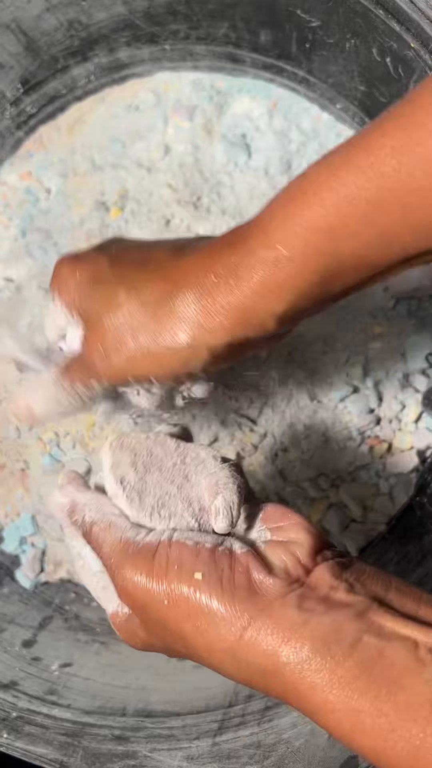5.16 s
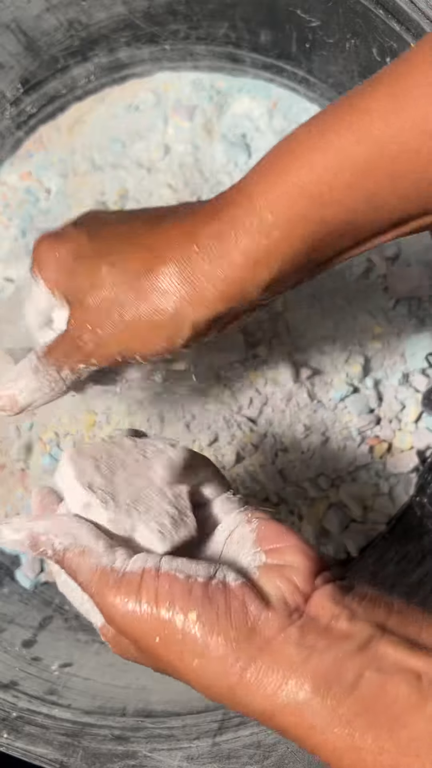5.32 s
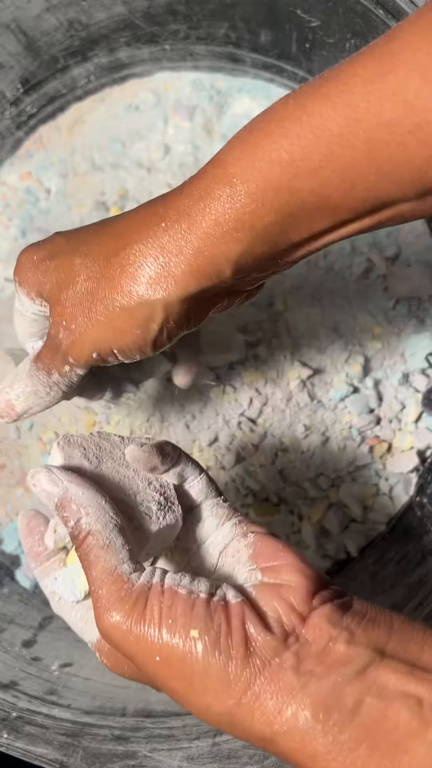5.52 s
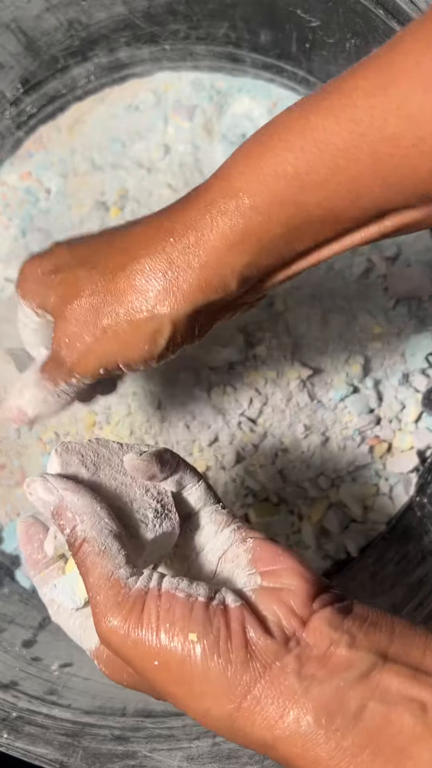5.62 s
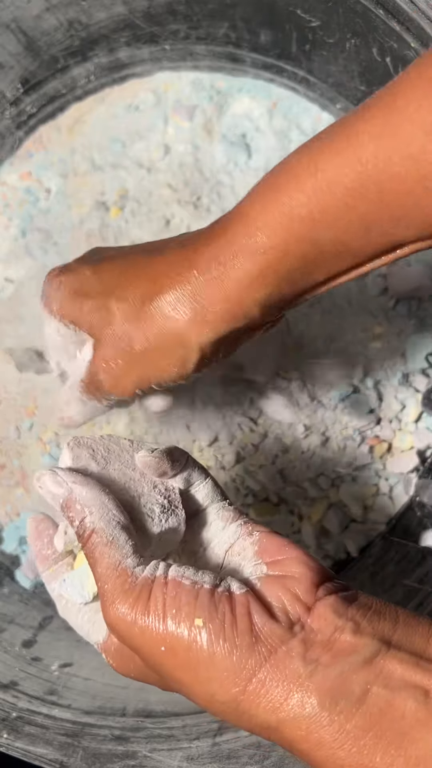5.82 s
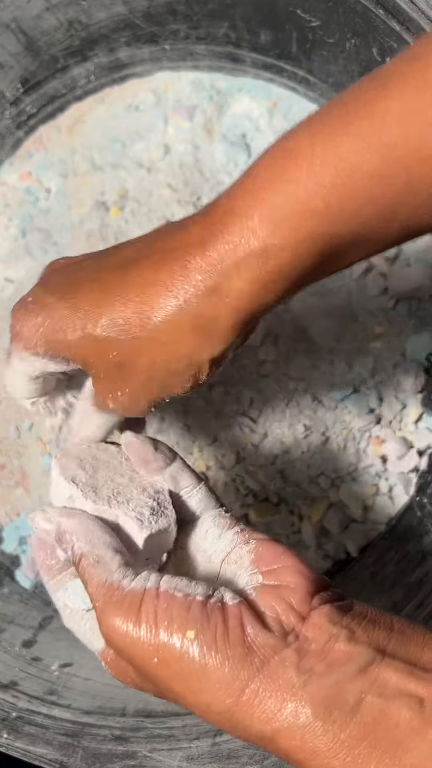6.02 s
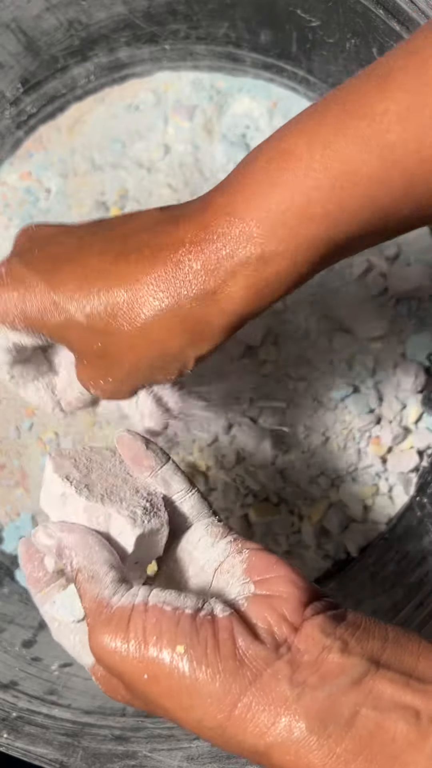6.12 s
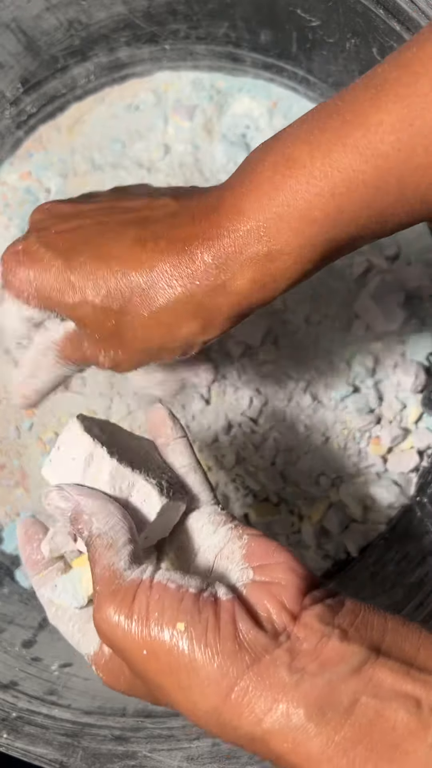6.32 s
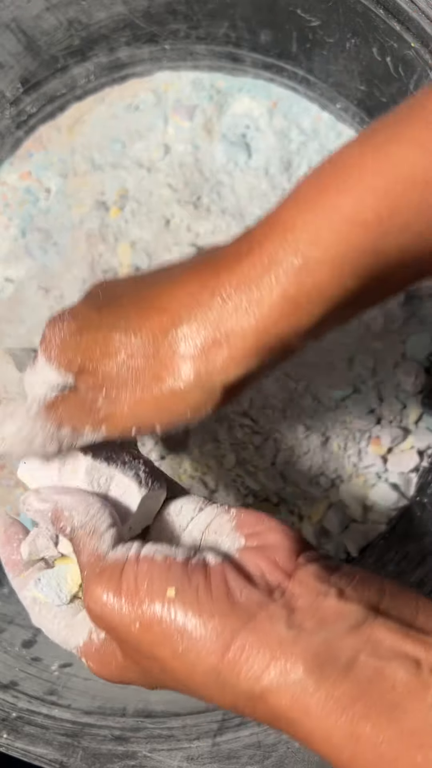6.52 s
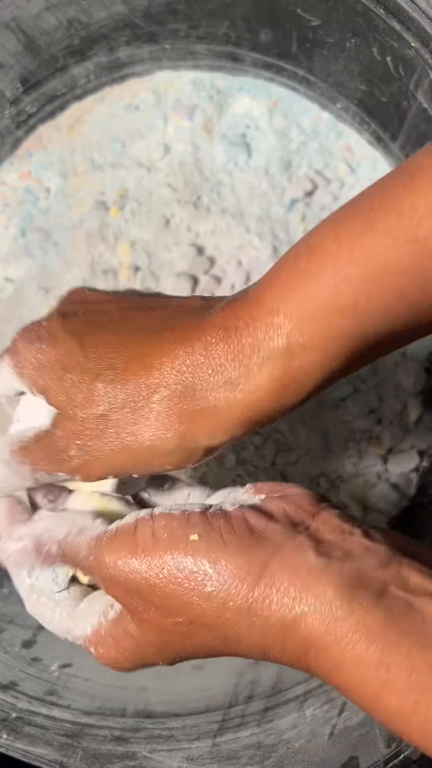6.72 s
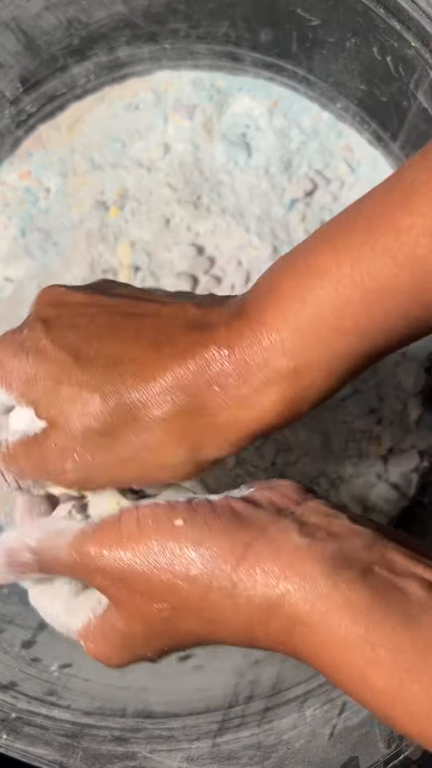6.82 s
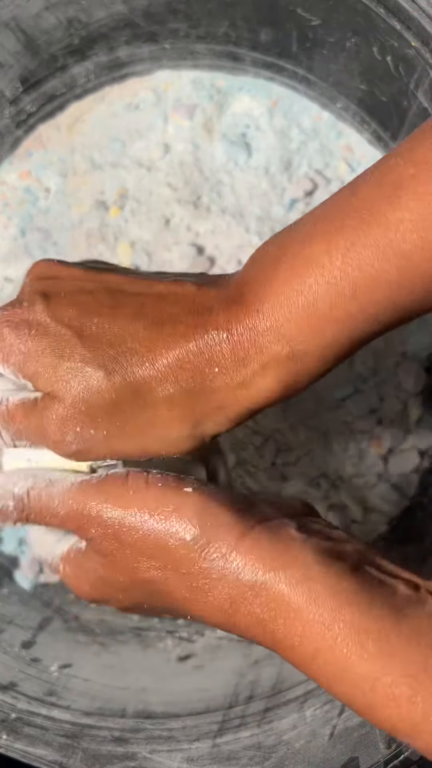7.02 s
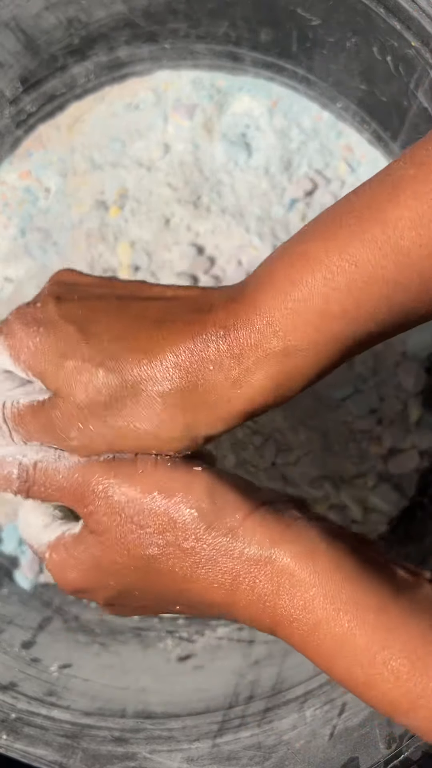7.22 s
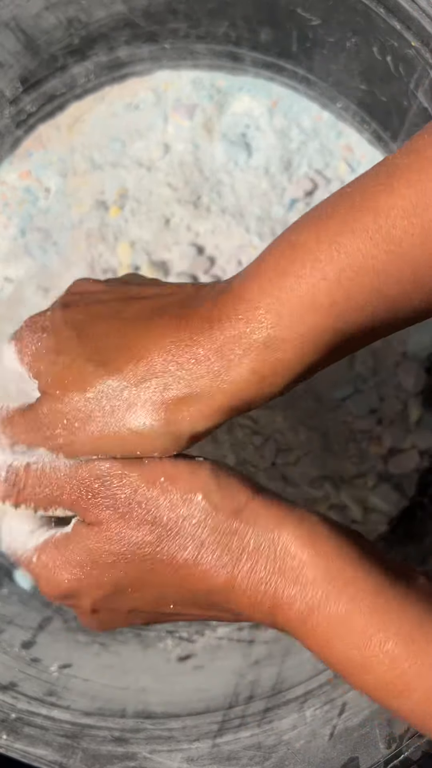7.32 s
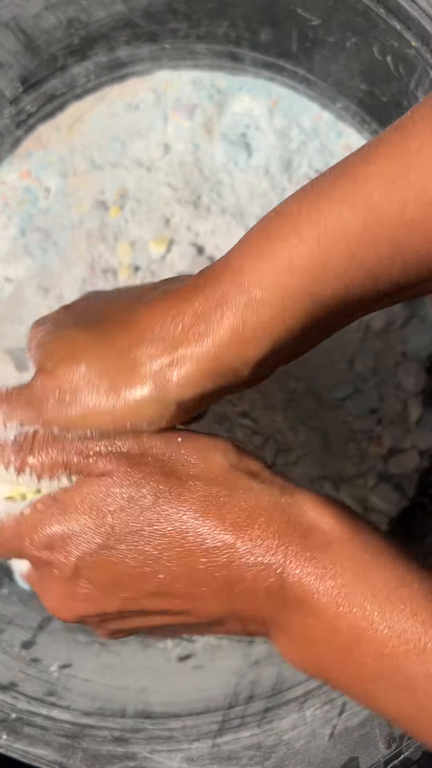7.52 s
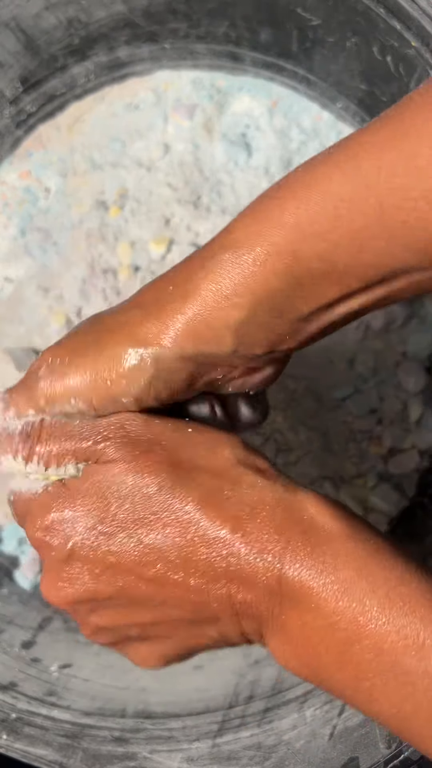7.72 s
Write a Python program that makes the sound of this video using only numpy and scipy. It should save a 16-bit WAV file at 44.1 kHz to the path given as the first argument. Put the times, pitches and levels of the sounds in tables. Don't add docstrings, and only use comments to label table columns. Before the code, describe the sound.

Very close to the microphone in a quiet, dry room, hands rub and crush chalky lumps over a plastic tub. Light powdery strokes and small clicks come first, then a heavy hollow thud at two seconds with crumbs sliding. Sparse crunches follow, another heavy crack near five seconds, then a dense burst of snaps and clattering bits just before six, thinning to soft rubbing and a few ticks.

```python
import sys
import numpy as np
from scipy import signal
from scipy.fft import rfft, irfft, next_fast_len
from scipy.io import wavfile
from scipy.ndimage import uniform_filter1d

SR = 44100
rng = np.random.default_rng(int(sys.argv[2]) if len(sys.argv) > 2 else 0)


def store_pcm(level_fs):
    pcm = np.round(np.clip(level_fs, -1, 1) * 32767).astype(np.int16)
    wavfile.write(sys.argv[1], SR, np.atleast_2d(pcm).T)


def ratio_of_db(decibels):
    return 10 ** (np.asarray(decibels, float) / 20)


N = 342657

# (frequency [Hz], level [dB per Hz])
POWDER_COLOUR = [(880, -29.5), (1500, -8), (3000, -6.5), (3920, -8), (4550, -7.5), (5490, -10.5),
                 (6310, -14), (7400, -14.5), (10700, -8.5), (15200, -25), (16000, -23)]


def evened(x):
    return x / np.sqrt(np.mean(x ** 2) + 1e-20)


def peaked(x):
    return x / (abs(x).max() + 1e-20)


def colour(x, points):
    hz, db = np.transpose(points)
    size = next_fast_len(len(x))
    bins = np.fft.rfftfreq(size, 1 / SR)
    gain = ratio_of_db(np.interp(np.log(bins + 1), np.log(hz + 1), db))
    return irfft(rfft(x, size) * gain, size)[:len(x)]


def add(mix, s, sound):
    part = mix[round(s * SR):][:len(sound)]
    part += sound[:len(part)]


def swell(s, length):
    bell = np.exp(-np.linspace(-1.5, 1.5, round(3 * length * SR)) ** 2 / 0.2)
    return max(s - 1.55 * length, 0), bell


def grit(count, per_s, spread_db):
    place, size, sign = rng.random((3, count // 200))
    used = np.arange(len(place)) < per_s * count / SR
    level_db = spread_db * np.minimum(-np.log(size), 4)
    out = np.zeros(count)
    out[(place * count).astype(int)] = used * ratio_of_db(level_db) * np.sign(sign - 0.5)
    return out


def grains(low_hz, high_hz, cycles, per_s, spread_db):
    t, out = np.arange(900) / SR, np.zeros(N)
    for hz in np.geomspace(low_hz, high_hz, num=8):
        ring = ratio_of_db(-60 * t * hz / cycles) * np.sin(2 * np.pi * hz * t)
        out += signal.oaconvolve(grit(N, per_s, spread_db), ring)[:N]
    return evened(out)


def mottled(patchy_db):
    z = signal.stft(rng.standard_normal(N), nperseg=256)[2]
    patches = uniform_filter1d(rng.standard_normal(z.shape), size=5, axis=0)
    patches = uniform_filter1d(patches, size=9, axis=1)
    hiss = signal.istft(z * ratio_of_db(patchy_db * evened(patches)), nperseg=256)[1]
    return evened(hiss[:N])


def room():
    # (frequency [Hz], level [dB per Hz])
    room_colour = [(12, -29), (22, -1), (46, -6), (62, -1.5), (82, -15), (168, -21.5), (319, -17.5),
                   (422, -26), (600, -23), (800, -33), (1120, -31), (1480, -32.5), (6910, -60),
                   (9670, -48.5), (16000, -55.5)]
    return ratio_of_db(-47) * evened(colour(rng.standard_normal(N), room_colour))


def stand():
    # (time [s], signed peak, frequency [Hz], time to fall 60 dB [s])
    jolts = [
        (2.011, 0.042, 37, 0.46),
        (4.87, -0.032, 37.2, 0.42),
        (5.363, -0.021, 39.4, 0.17),
        (5.73, -0.035, 29.8, 0.29),
        (5.924, -0.21, 73.4, 0.008),
        (5.932, 0.043, 105, 0.03),
        (5.953, 0.23, 42, 0.048),
        (5.987, -0.1, 36, 0.52),
        (6.179, -0.18, 76, 0.0099),
        (6.316, 0.031, 64, 0.11),
    ]
    t, out = np.arange(SR) / SR, np.zeros(N)
    for s, peak, hz, t60 in jolts:
        onset = 1 - np.exp(-t / 0.002)
        swing = ratio_of_db(-60 * t / t60) * np.sin(2 * np.pi * hz * t) * onset
        add(out, s, peak * peaked(swing))
    return out


def effort(fine):
    # (time [s], level [dB])
    trickle = [(0.0, -67.5), (0.6, -67.5), (0.9, -69), (1.2, -55.5), (1.8, -62.5), (2.1, -62),
               (2.39, -59.5), (2.69, -54.5), (2.99, -70.5), (3.29, -63), (3.89, -65), (4.49, -63),
               (5.39, -64.5), (5.99, -55), (6.59, -71), (7.18, -70), (7.77, -66)]
    # (time [s], level [dB], length [s])
    strokes = [(0.29, -52.5, 0.074), (0.381, -51.5, 0.077), (0.539, -46, 0.047), (0.792, -52.5, 0.11),
               (0.925, -52.5, 0.075), (1.017, -51, 0.043), (1.09, -46, 0.024), (1.151, -48.5, 0.04),
               (1.217, -48, 0.019), (1.547, -46.5, 0.046), (2.264, -46.5, 0.063), (2.364, -50, 0.024),
               (2.882, -53.5, 0.021), (2.965, -50, 0.016), (3.086, -52.5, 0.24), (3.696, -56, 0.085),
               (3.813, -51.5, 0.054), (3.95, -49.5, 0.046), (4.616, -50, 0.023), (4.772, -49, 0.028),
               (5.506, -54.5, 0.066), (5.66, -56, 0.058), (5.735, -36.5, 0.013), (6.535, -50, 0.023),
               (6.619, -53, 0.042), (6.732, -58.5, 0.24), (6.98, -57, 0.1), (7.179, -51, 0.062),
               (7.285, -55.5, 0.01), (7.43, -59, 0.039), (4.965, -55, 0.025), (4.832, -47, 0.01),
               (5.085, -52.5, 0.012), (7.558, -50, 0.05), (7.671, -52, 0.034)]
    # (time [s], level [dB], length [s])
    puffs = [(0.01, -46.5, 0.011), (0.072, -56, 0.052), (1.379, -50, 0.059), (1.481, -46, 0.012),
             (1.712, -49, 0.011), (2.496, -49, 0.064), (2.688, -49.5, 0.089), (3.269, -49.5, 0.076),
             (3.453, -55, 0.076), (3.553, -49, 0.037), (4.073, -48, 0.02), (4.14, -41.5, 0.042),
             (4.259, -46, 0.086), (4.865, -55, 0.081), (4.925, -33, 0.018), (5.136, -42.5, 0.051),
             (5.36, -52, 0.026), (5.803, -32, 0.025), (5.853, -40.5, 0.035), (5.905, -30, 0.011),
             (5.95, -44, 0.066), (6.127, -46, 0.016), (6.173, -46.5, 0.061), (6.261, -43, 0.016),
             (6.326, -33.5, 0.019), (6.405, -51.5, 0.036), (7.092, -46, 0.018)]
    # (time [s], level [dB], length [s])
    slides = [
        (2.02, -45.5, 0.25),
    ]
    seconds, trickle_db = np.transpose(trickle)
    power = ratio_of_db(2 * np.interp(np.arange(N) / SR, seconds, trickle_db) - fine * 14)
    for rows, fine_db in (strokes, -2), (puffs, -11), (slides, -5):
        for s, db, length in rows:
            start, bell = swell(s, length)
            add(power, start, ratio_of_db(2 * (db - 4.5 + fine * fine_db)) * bell)
    return np.sqrt(power)


def heap():
    low_band = signal.butter(2, [70, 230], "band", fs=SR, output="sos")
    low = signal.sosfilt(low_band, rng.standard_normal(N))
    return ratio_of_db(-3.5) * effort(0) * evened(low)


def rub():
    gritty = grains(1500, 7000, 5, 70, 4.2)
    powder = colour(mottled(3.2) + ratio_of_db(-6) * gritty, POWDER_COLOUR)
    coarse = signal.sosfiltfilt(signal.butter(4, 6500, fs=SR, output="sos"), powder)
    finest = powder - coarse
    crumbs = ratio_of_db(-1.5) * grains(453, 2430, 5.0, 130, 2.1)
    return effort(0) * (evened(coarse) + crumbs) + effort(1) * evened(finest)


def skin():
    # (time [s], level [dB], length [s], frequency [Hz])
    slips = [
        (0.372, -46.5, 0.016, 6300),
        (0.777, -52, 0.034, 5930),
        (0.388, -50, 0.048, 1500),
        (0.54, -45, 0.034, 1660),
        (0.927, -59, 0.054, 2400),
        (3.2, -50, 0.014, 2100),
        (2.97, -58, 0.011, 5900),
        (3.085, -60, 0.027, 2700),
    ]
    out = np.zeros(N)
    for s, db, length, hz in slips:
        start, bell = swell(s, length)
        hiss = signal.lfilter(*signal.iirpeak(hz, 6.0, SR), rng.standard_normal(len(bell)))
        add(out, start, ratio_of_db(db) * evened(hiss) * np.sqrt(bell))
    return out


def debris():
    power = np.zeros(N)
    start, bell = swell(5.95, 0.085)
    add(power, start, bell)
    return ratio_of_db(-36.5) * np.sqrt(power) * grains(440, 2700, 5.2, 30, 2.9)


def snap(hz, t60):
    t = np.arange(SR // 10) / SR
    burst = 0.088 * rng.standard_normal(len(t)) * ratio_of_db(-60 * t / np.clip(t60, 0.002, 0.3))
    burst[0] = 1
    chip = signal.lfilter(*signal.iirpeak(min(hz, 14000), 1.3, SR), burst)
    wide_band = [0.33 * hz, min(3.3 * hz, 12000)]
    wide = signal.lfilter(*signal.butter(2, wide_band, "band", fs=SR), burst)
    dulled = signal.lfilter(*signal.butter(2, min(2.82 * hz, 12000), fs=SR), chip)
    return peaked(dulled + 0.32 * wide)


def fractures():
    # (time [s], peak [dB], time for the grit to fall 60 dB [s])
    snaps = [(0.0628, -31, 0.026), (1.47, -36, 0.02), (2.0025, -19.5, 0.044), (2.2007, -29.5, 0.0095),
             (2.477, -33, 0.015), (2.624, -30, 0.016), (2.6494, -31, 0.029), (3.034, -37, 0.053),
             (4.064, -34.5, 0.026), (4.141, -25.5, 0.046), (4.4803, -32, 0.014), (4.853, -25, 0.07),
             (4.912, -18, 0.039), (5.114, -34, 0.023), (5.136, -32, 0.028), (5.201, -36, 0.051),
             (5.2869, -29, 0.012), (5.335, -28, 0.0093), (5.4265, -20, 0.0094), (5.618, -34.5, 0.022),
             (5.7259, -16, 0.017), (5.779, -6.5, 0.027), (5.8491, -8.5, 0.0038), (5.9406, -25, 0.012),
             (6.043, -30.5, 0.0081), (6.157, -32, 0.02), (6.31, -20, 0.06), (6.7105, -22, 0.019),
             (7.4992, -29.5, 0.017)]
    # (time [s], peak [dB], colour [Hz])
    splinters = [(0.5062, -25.5, 5700), (0.998, -28.5, 8300), (1.2027, -27, 4260), (1.339, -33, 5330),
                 (1.3728, -24.5, 5250), (2.2576, -25.5, 4730), (2.4575, -38, 3740), (3.315, -37.5, 4130),
                 (3.4292, -42, 4000), (3.5257, -39, 4340), (3.55, -30.5, 4120), (4.104, -40, 3970),
                 (5.152, -19.5, 9200), (5.1674, -16, 6540), (5.645, -33.5, 4300), (5.779, -3, 7800),
                 (5.801, -18, 9500), (5.817, -22, 10000), (5.868, -23, 9000), (5.878, -21, 9000),
                 (5.958, -27, 8000), (6.108, -35, 3880), (6.2339, -26, 3630), (6.291, -40, 3360),
                 (6.3686, -35.5, 5290), (6.51, -17, 7100), (6.56, -27, 6070), (5.89, -22, 9200)]
    # (time [s], peak [dB])
    ticks = [
        (1.736, -38),
        (2.162, -40),
        (5.208, -31.5),
        (6.241, -31),
        (6.439, -42),
        (6.546, -46),
        (6.569, -30),
        (6.75, -38),
    ]
    cracks = np.zeros(N)
    for s, db, t60 in snaps:
        add(cracks, s, ratio_of_db(db) * snap(2930, t60))
    for s, db, hz in splinters:
        add(cracks, s, ratio_of_db(db) * snap(hz, 126 / hz))
    for s, db in ticks:
        add(cracks, s, ratio_of_db(db) * snap(5000, 0.01))
    return ratio_of_db(12.0) * colour(cracks, POWDER_COLOUR)


def knock(centre_hz, spread, thud_db, t60):
    # (frequency [Hz], level [dB], factor on the decay time)
    tub_modes = [(139, -2, 1.7), (246.6, 2.5, 0.99), (330, -2, 0.79), (455, -3, 0.13), (557, 6, 0.59),
                 (627, 7, 0.21), (867, 3.5, 0.59), (1099, 8, 0.37), (1400, 4, 0.59), (1705, -3.5, 0.74),
                 (1900, 0, 0.74), (2220, 6, 0.33), (2480, -17, 0.73), (2860, 1, 0.38)]
    t = np.arange(SR // 7) / SR
    hz, db, factor = np.transpose(tub_modes)[:, :, None]
    luck = rng.standard_normal((len(tub_modes), 3))
    mode_t60 = np.clip(t60, 0.01, 0.5) * factor * np.minimum(centre_hz / hz, 1) ** 0.12
    tuned_hz = hz * (1 + 0.031 * luck[:, 1:2])
    modes = ratio_of_db(db + 1.2 * luck[:, :1] - 60 * t / mode_t60) * np.sin(2 * np.pi * tuned_hz * t)
    modes *= np.sign(luck[:, 2:]) * (1 - np.exp(-t * hz))
    contacts = rng.standard_normal(1200) * ratio_of_db(-60 * t[:1200] / (1.3 * t60))
    contacts *= rng.random(1200) < 0.012
    contacts[0] = 3.2
    octaves = np.log2(hz / centre_hz) / np.clip(spread, 0.2, 3)
    near = ratio_of_db(np.minimum(-14 * np.sqrt(abs(octaves) + 0.33) * 1.7, 21 * octaves))
    thud = peaked(modes[:3].sum(0))
    ring = peaked((near * modes).sum(0)) + ratio_of_db(thud_db) * thud
    ring += 0.36 * ratio_of_db(-60 * t * centre_hz / 1.5) * np.sin(2 * np.pi * 1.1 * centre_hz * t)
    return peaked(signal.fftconvolve(ring, contacts))


def blows():
    # (time [s], peak [dB], strongest ring [Hz], time to fall 60 dB [s])
    landings = [(0.055, -29, 327, 0.093), (1.37, -22.5, 710, 0.022), (1.899, -32.5, 656, 0.082),
                (1.923, -20.5, 387, 0.061), (1.939, -26, 560, 0.033), (2.042, -21, 837, 0.023),
                (2.499, -31, 460, 0.024), (4.098, -42, 1890, 0.059), (4.477, -27, 1360, 0.023),
                (4.913, -26, 1540, 0.065), (5.61, -28, 490, 0.05), (5.702, -27, 455, 0.097),
                (5.86, -16.5, 1420, 0.038), (5.907, -25, 523, 0.085), (5.938, -17.5, 715, 0.019),
                (5.9698, -22, 566, 0.043)]
    # (time [s], peak [dB], strongest ring [Hz], time to fall 60 dB [s])
    breaks = [
        (1.551, -27.5, 630, 0.027),
        (5.198, -24.5, 577, 0.026),
        (5.269, -25, 450, 0.029),
        (5.722, -14.5, 1620, 0.031),
        (6.508, -23.5, 1228, 0.032),
    ]
    # (time [s], peak [dB], strongest ring [Hz])
    crumbs = [(0.995, -29, 710), (1.403, -36.5, 570), (2.618, -37, 478.5), (2.644, -38, 514),
              (3.123, -34, 547), (3.175, -35.5, 576), (3.223, -29, 800), (3.4, -34.5, 264),
              (3.454, -34, 790), (3.548, -35, 590), (3.95, -40, 312), (4.404, -38, 247), (5.285, -34, 553),
              (5.833, -21, 800), (5.924, -20.5, 134), (5.996, -29, 900), (6.041, -31, 610),
              (6.155, -26.5, 253), (6.233, -37.5, 538), (6.356, -28.5, 686), (6.063, -35, 900),
              (7.079, -34.5, 580), (7.171, -30, 325), (7.205, -38, 292), (7.497, -31.5, 246)]
    # (time [s], peak [dB], strongest ring [Hz])
    thin_chips = [(.061, -35, 2480), (0.507, -34, 1590), (0.538, -34, 1840), (1.142, -34, 2370),
                  (1.2, -32.5, 1370), (1.339, -31, 2040), (1.414, -43, 2140), (1.466, -28, 1800),
                  (2.456, -30, 1790), (3.525, -33, 1740), (4.065, -35, 1420), (4.114, -25, 2190),
                  (4.128, -25.5, 2550), (4.139, -22.5, 2420), (5.166, -26.5, 1306), (6.051, -25, 1190),
                  (6.106, -29, 1080), (6.565, -30.5, 1610), (7.143, -36, 1665)]
    hits = np.zeros(N)
    for rows, spread, thud_db in (landings, 1, -9), (breaks, 1.8, -56):
        for s, db, hz, t60 in rows:
            add(hits, s + 0.00135, ratio_of_db(db) * knock(hz, spread, thud_db, t60))
    for rows, t60 in (crumbs, 0.044), (thin_chips, 0.023):
        for s, db, hz in rows:
            add(hits, s + 0.00138, ratio_of_db(db) * knock(hz, 5.7, -18, t60))
    return hits


def lump(modes):
    touch_s, settle_s = 0.00055, 0.026
    t = np.arange(SR // 6) / SR
    hz, db, t60 = np.transpose(modes)[:, :, None]
    fade = t / np.clip(t60, 0.005, 0.07 * (600 / hz) ** 0.8)
    build_s = 0.00076 * (600 / hz) ** 1.86
    build = 1 - np.exp(-(t / build_s) ** 2)
    ring = ratio_of_db(db - 50 * fade - 25 * fade ** 2) * np.sin(2 * np.pi * hz * t) * build
    touches = rng.standard_normal(1300) * ratio_of_db(-17 - 60 * t[:1300] / settle_s)
    touches *= rng.random(1300) < 0.025
    touches[0] = 1
    crunch = signal.lfilter(*signal.butter(2, 1500, fs=SR), rng.standard_normal(len(t)))
    crunch *= ratio_of_db(-60 * t / (1.6 * t60.mean())) * np.minimum(t / 0.0017, 1)
    body = peaked(signal.fftconvolve(ring.sum(0), touches)[:len(t)]) + ratio_of_db(-11.5) * peaked(crunch)
    soft = (t[:200] / touch_s) ** 2 * np.exp(-8 * t[:200] / touch_s)
    small = signal.butter(5, 0.85 * hz.min(), "high", fs=SR, output="sos")
    return -peaked(signal.sosfilt(small, signal.fftconvolve(body, soft)))


def ping(hz, cycles):
    t = np.arange(1500) / SR
    other_hz = hz * (1 + 0.47 * rng.uniform(-1.3, 1))
    second_s = rng.uniform(0.00076, 0.0035)
    decay = ratio_of_db(-60 * t * hz / cycles)
    ring = np.sin(2 * np.pi * hz * t) + 0.25 * decay * np.sin(2 * np.pi * other_hz * t)
    ring = ring * decay
    add(ring, second_s, 0.44 * ring.copy())
    return -peaked(ring)


def chips():
    # (time [s], peak [dB], modes (frequency [Hz], level [dB], time to fall 60 dB
    # [s]))
    lumps = [
        (1.9997, 6, [(170, -9.5, 0.1), (242, -8, 0.097), (330, -3.5, 0.072), (532, 4, 0.053), (595, 8, 0.038), (1109, 2.5, 0.035), (1400, -4, 0.038), (1800, -7.5, 0.025), (2480, -27, 0.035)]),
        (4.7711, -13, [(250, -14, 0.04), (406, 2.5, 0.012), (564, -6, 0.021), (794, -10.5, 0.026), (1350, -19.5, 0.014)]),
        (4.854, 6, [(181, -17, 0.11), (244.5, -15, 0.11), (455, 5.5, 0.027), (571, -1, 0.031), (867, -0.5, 0.025), (1110, -10, 0.027), (1278, -3, 0.02), (2000, -29, 0.027), (2480, -20, 0.042)]),
        (5.0051, -15, [(322, -3, 0.07), (438, 4.5, 0.043), (675, -12, 0.056), (843, 9, 0.02), (1125, 3.5, 0.026), (2330, -3.5, 0.031)]),
        (5.3562, -3.5, [(160, -20, .1), (243, -17.5, 0.14), (328, -14, 0.12), (650, -3, 0.06), (820, 12, 0.014), (1138, 5, 0.035), (1400, -0.5, 0.035), (1705, -3.5, 0.068), (2290, -2.5, 0.049)]),
        (5.5213, -15.5, [(697, -2, 0.094), (1040, -8, 0.053), (1146, 4.5, 0.017), (1390, -1.5, 0.084), (2120, -3.5, 0.023)]),
        (5.7787, 0.5, [(247, -23, 0.14), (597, -0.5, 0.051), (822, 7, 0.021), (927, 3, 0.025), (1230, 7.5, 0.018), (1390, -1, .06), (2930, -15, .02)]),
        (5.849, -5.5, [(570, -14, 0.03), (947, 7.5, 0.015), (1070, 3, 0.017), (1480, -4, 0.027), (2760, 0, 0.014)]),
        (6.711, -12, [(590, -19, 0.028), (690, -7, 0.037), (845, 8, 0.025), (1153, 7, 0.023), (1265, -4, 0.043), (2070, 10.5, 0.0088)]),
             (5.4265, -16.5, [(605, -12, 0.068), (895, -12, 0.068), (1190, -2, .023), (1693, 2.5, 0.022), (2260, -4, 0.017)]),
        (6.1801, -16.5, [(256, -1.5, 0.047), (682, 0.5, 0.032), (940, 0, 0.022), (1790, -3.5, 0.025), (2500, -3, 0.019)]),
        (6.3264, -17.5, [(295, 3, 0.046), (479, 1, 0.05), (826, -1, .05), (1030, 2, 0.026), (1770, -2, 0.034), (2350, -12, .03)]),
    ]
    # (time [s], peak [dB], ring [Hz])
    knocks = [(0.0508, -36, 420), (0.0515, -36, 1700), (0.0612, -17.5, 2250), (1.0072, -30, 2500),
              (5.8012, -25, 2900), (1.4037, -32, 1980), (1.4277, -35, 1680), (1.4452, -35, 2220),
              (1.4794, -28.5, 2160), (1.7374, -38, 1480), (5.954, -24, 1750), (1.9006, -23.5, 680),
              (2.0447, -28.5, 1400), (2.8789, -33, 1730), (3.0292, -30, 1960), (3.2557, -32, 2120),
              (5.9435, -20, 2100), (3.4555, -35, 795), (3.4735, -28.5, 1900), (4.0147, -37.5, 2110),
              (4.065, -30, 1450), (4.1032, -24, 1380), (4.1248, -28, 580), (4.1777, -34, 2820),
              (4.2558, -33, 1866), (4.9118, -23.5, 1450), (5.0132, -16.5, 437), (5.0831, -35.5, 1830),
              (5.161, -30, 1510), (5.1689, -23.5, 1190), (5.897, -26, 560), (5.3367, -34, 563),
              (5.6823, -37, 2320), (5.8008, -31.5, 1220), (5.8349, -19, 1340), (5.8706, -27, 1060),
              (5.9103, -22, 2330), (5.4178, -20.5, 397), (6.0438, -26, 1430), (6.272, -33, 620),
              (6.5472, -31, 1670), (6.5955, -38.5, 2690), (7.0398, -39, 1900), (7.0914, -29, 1770),
              (7.5077, -30.5, 1670)]
    # (time [s], peak [dB], ring [Hz])
    more_knocks = [(2.476, -13, 2000), (2.486, -35, 1950), (2.4938, -29, 1900), (2.5, -26, 1950),
                   (2.5053, -19.5, 1910), (2.5138, -34, 1900), (3.432, -15, 1860), (3.446, -31, 2100),
                   (3.4799, -27, 1970), (5.9722, -22, 1830), (5.926, -29, 1250), (6.064, -31, 1380)]
    # (time [s], peak [dB], ring [Hz])
    sparks = [(0.5424, -30.5, 9000), (0.9623, -36, 8550), (0.9823, -37, 8570), (1.1436, -36, 8660),
              (1.2111, -44, 8400), (1.2878, -38, 10210), (1.4155, -37, 3570), (1.6297, -39, 4820),
              (1.8131, -39.5, 8910), (2.2135, -44, 3810), (2.2483, -34, 4540), (2.2787, -33, 4410),
              (2.3061, -40, 6010), (2.3419, -42, 9240), (2.7125, -43, 3510), (3.1758, -39, 3510),
              (3.3666, -38.5, 4430), (3.3999, -40, 3620), (3.4314, -37, 11180), (3.4771, -38, 10170),
              (3.9279, -40, 4400), (4.1157, -33, 3640), (4.5784, -42, 5300), (4.63, -42.5, 4070),
              (4.6868, -41.5, 5030), (4.8321, -42, 7560), (4.9165, -24.5, 9400), (5.1126, -30, 11050),
              (5.1355, -36, 3500), (5.7792, -8, 8000), (5.3658, -30.5, 3830), (5.7098, -42, 4570),
              (5.7882, -15, 9200), (5.8636, -30, 4570), (5.9048, -25, 4600), (5.9257, -27, 7200),
              (6.1652, -31, 9600), (6.3246, -35, 6240), (6.4878, -37, 7840), (6.5354, -31, 7750),
              (6.568, -30, 9260), (7.1457, -35, 7700)]
    out = np.zeros(N)
    for s, db, modes in lumps:
        add(out, s - 0.0003, ratio_of_db(db) * lump(modes))
    for rows, cycles in (knocks, 11), (more_knocks, 11), (sparks, 25):
        for s, db, hz in rows:
            add(out, s, ratio_of_db(db) * ping(hz, cycles))
    return out


def walls(x):
    t = np.arange(SR // 4) / SR
    bright = rng.standard_normal(len(t)) * ratio_of_db(-60 * t / 0.054)
    dull = signal.lfilter(*signal.butter(1, 900, fs=SR), rng.standard_normal(len(t)))
    dull *= ratio_of_db(0.5 - 60 * t / 0.12)
    tail = (bright + dull) * (t > 0.004)
    return signal.oaconvolve(x, tail / np.linalg.norm(tail))[:N]


def scene():
    background = room() + stand() + heap()
    powder = rub() + skin() + debris()
    hits = fractures() + blows() + chips()
    return (background + powder + hits + ratio_of_db(-20.0) * walls(hits))[None]


def band_limit(x):
    return signal.sosfilt(signal.butter(12, 16810, fs=SR, output="sos"), x)


def record(dry):
    ceiling = 0.9
    limited = ceiling * np.tanh((abs(dry) / ceiling) ** 3) ** (1 / 3) * np.sign(dry)
    band = signal.oaconvolve(limited, signal.firwin(383, 16000, fs=SR)[None], "same")
    return band_limit(band)


dry = scene()
out = record(dry)
store_pcm(out)
```